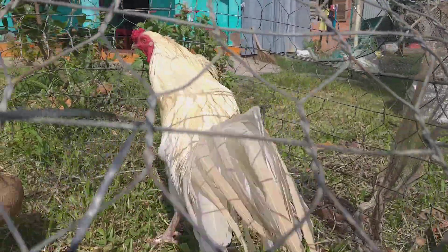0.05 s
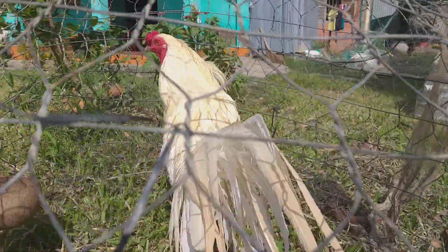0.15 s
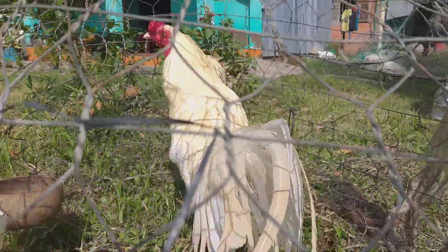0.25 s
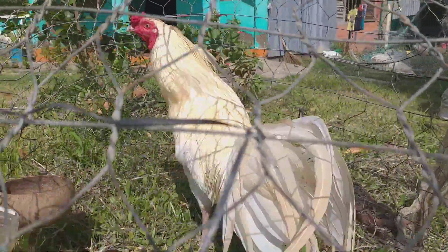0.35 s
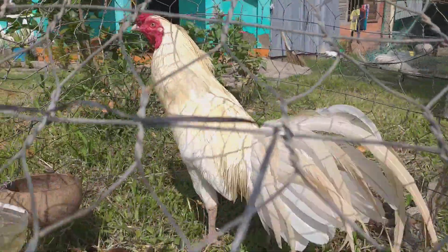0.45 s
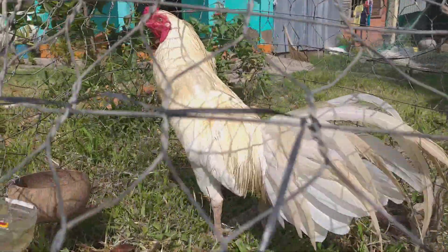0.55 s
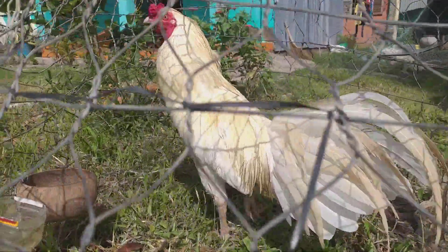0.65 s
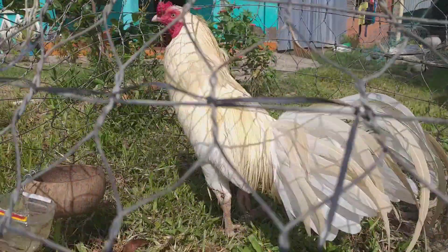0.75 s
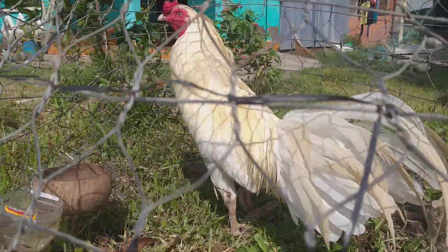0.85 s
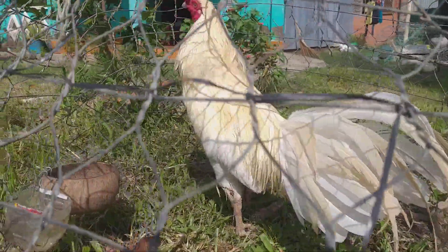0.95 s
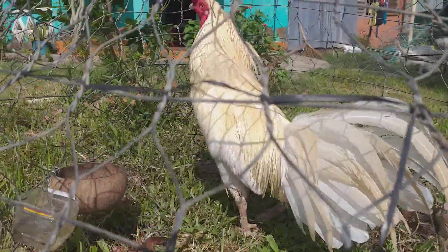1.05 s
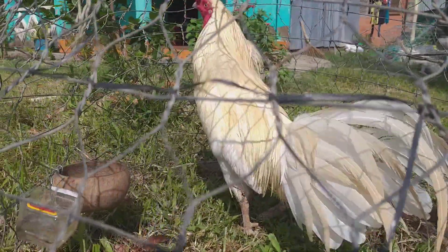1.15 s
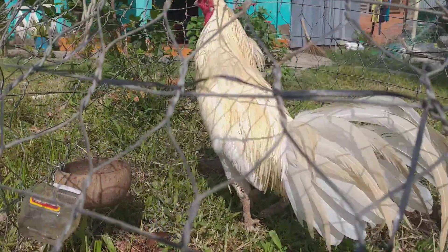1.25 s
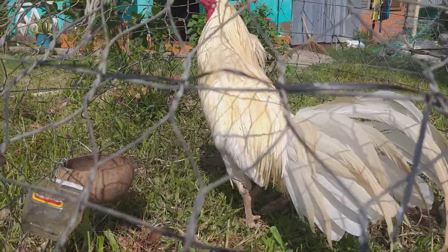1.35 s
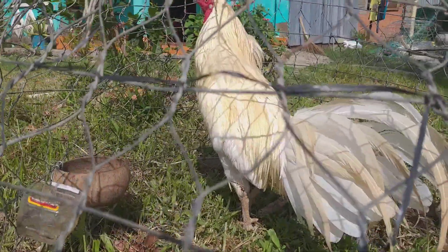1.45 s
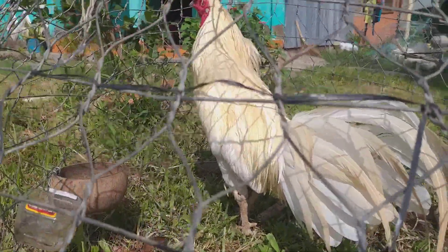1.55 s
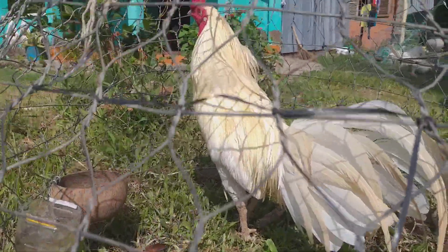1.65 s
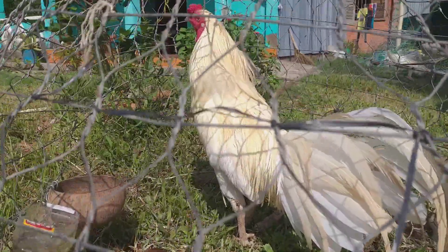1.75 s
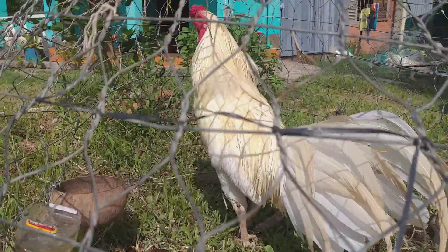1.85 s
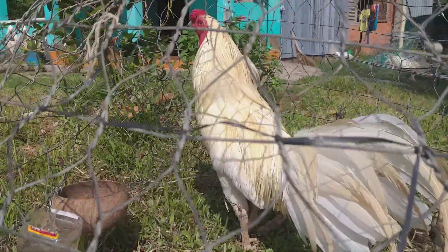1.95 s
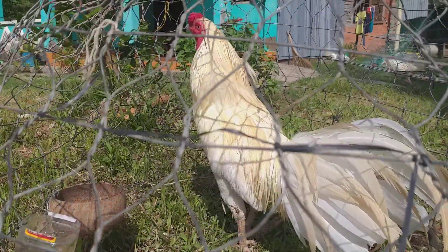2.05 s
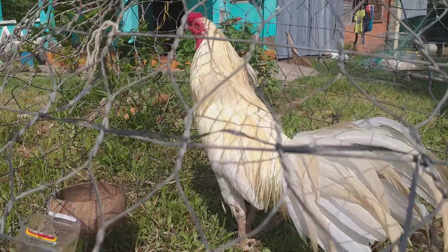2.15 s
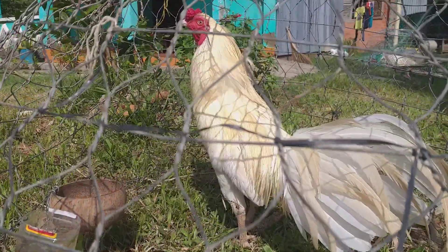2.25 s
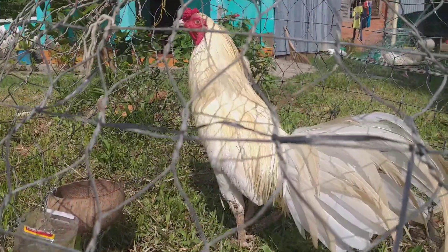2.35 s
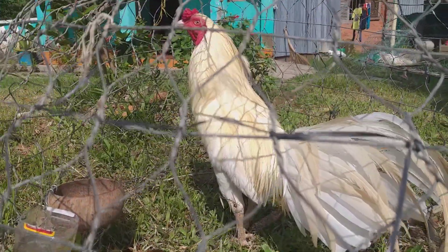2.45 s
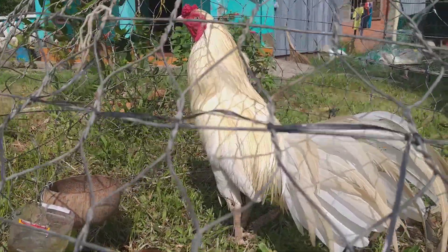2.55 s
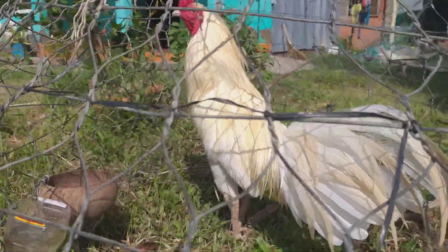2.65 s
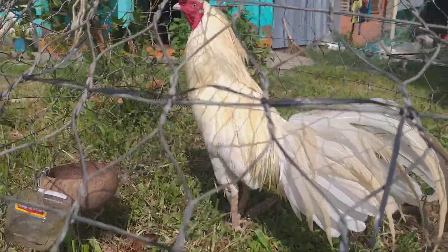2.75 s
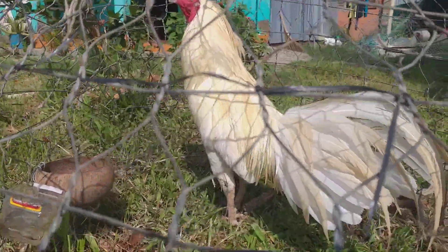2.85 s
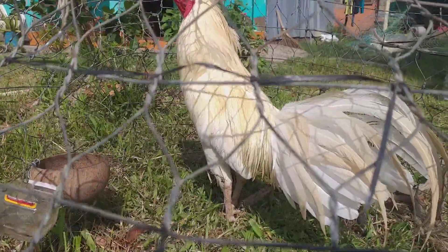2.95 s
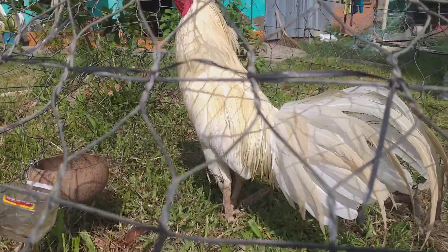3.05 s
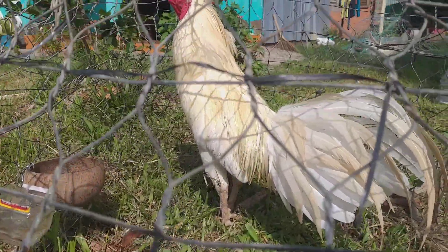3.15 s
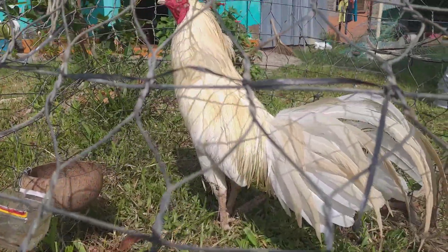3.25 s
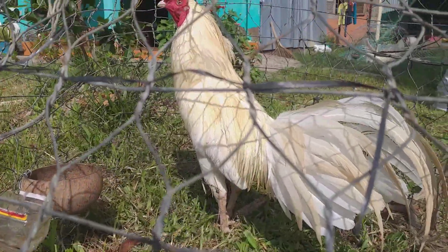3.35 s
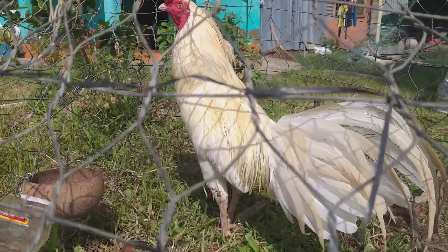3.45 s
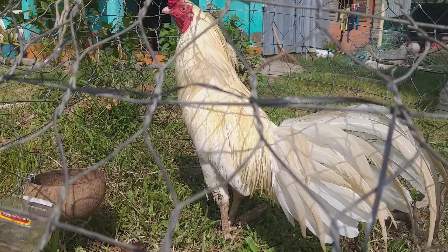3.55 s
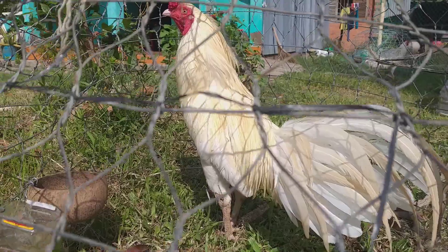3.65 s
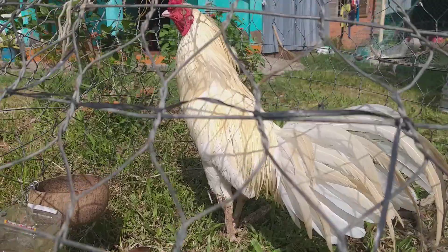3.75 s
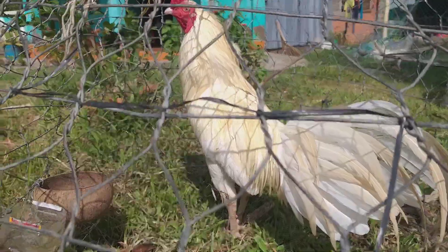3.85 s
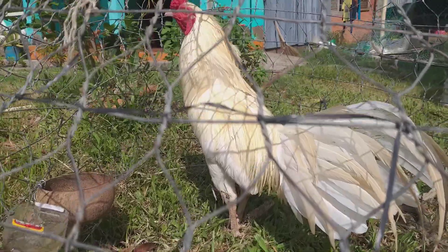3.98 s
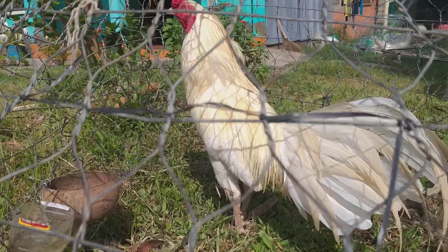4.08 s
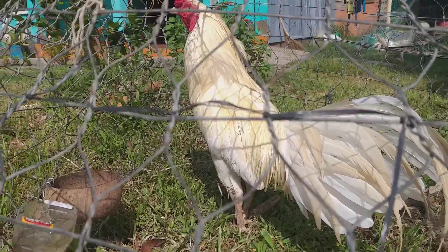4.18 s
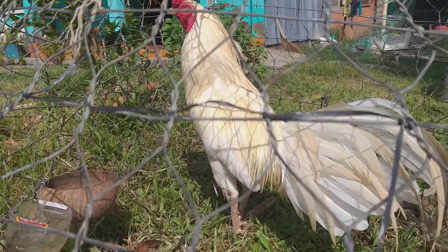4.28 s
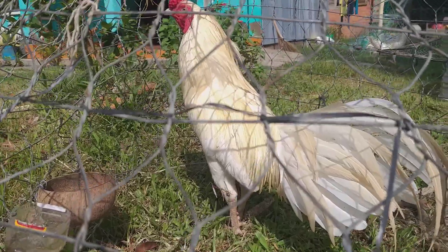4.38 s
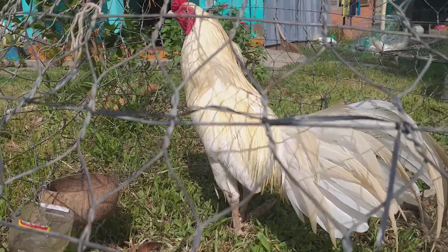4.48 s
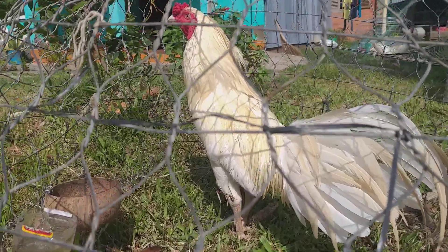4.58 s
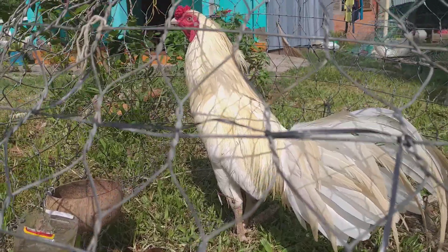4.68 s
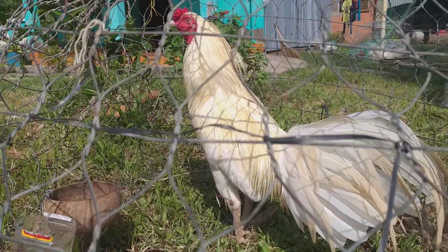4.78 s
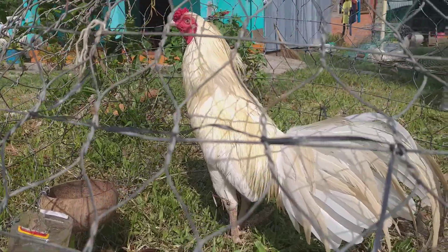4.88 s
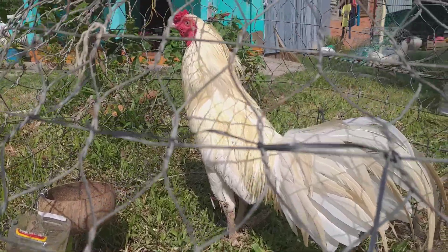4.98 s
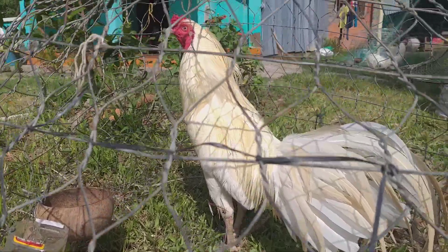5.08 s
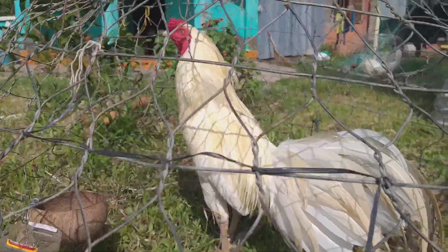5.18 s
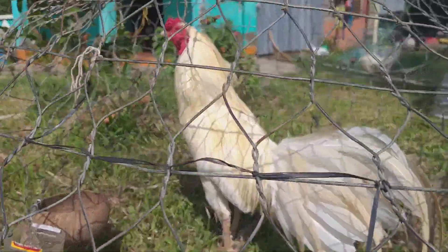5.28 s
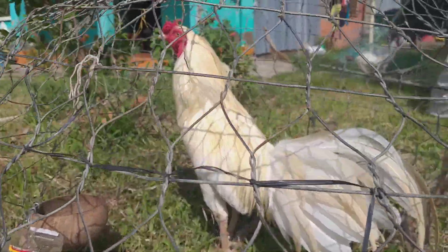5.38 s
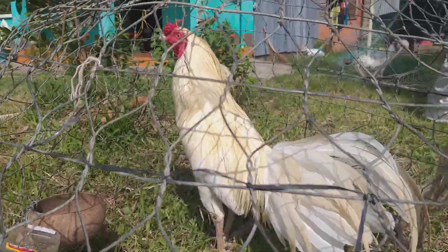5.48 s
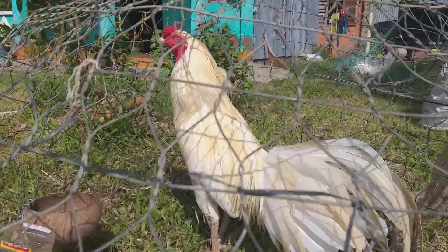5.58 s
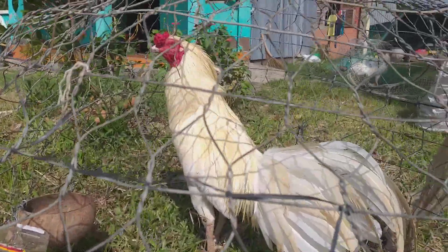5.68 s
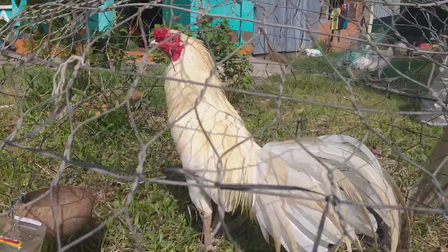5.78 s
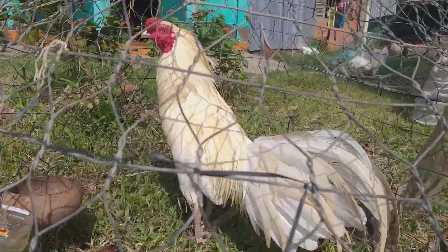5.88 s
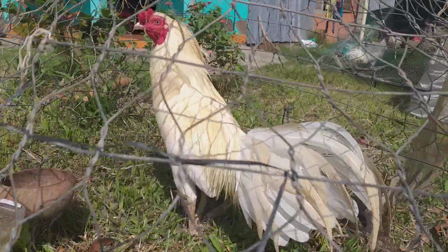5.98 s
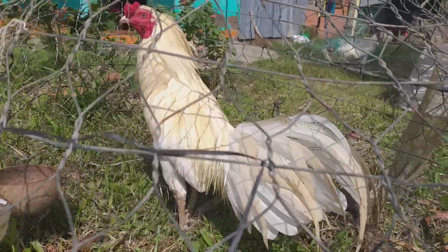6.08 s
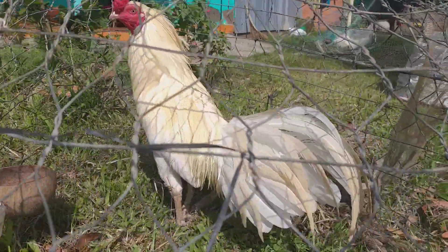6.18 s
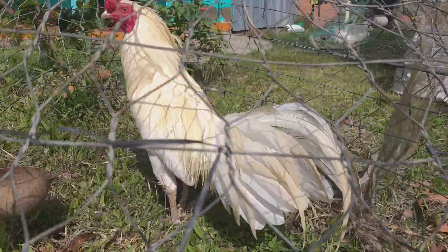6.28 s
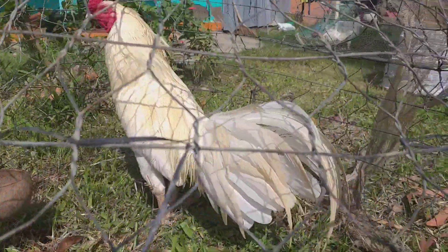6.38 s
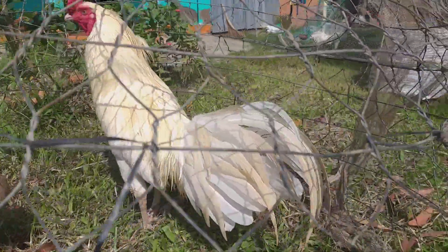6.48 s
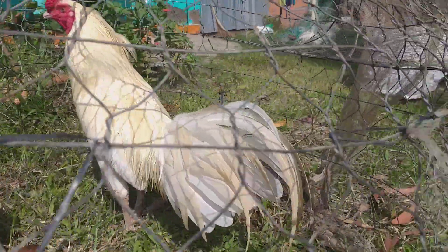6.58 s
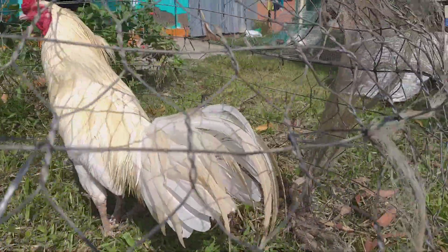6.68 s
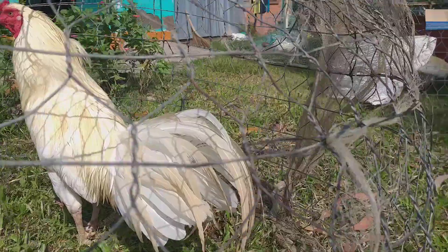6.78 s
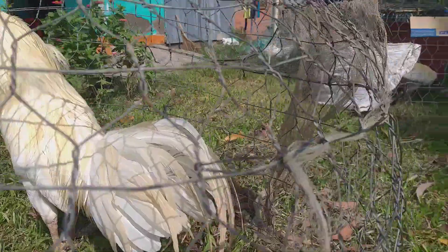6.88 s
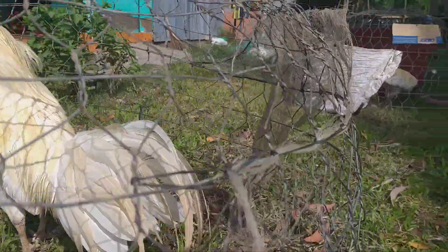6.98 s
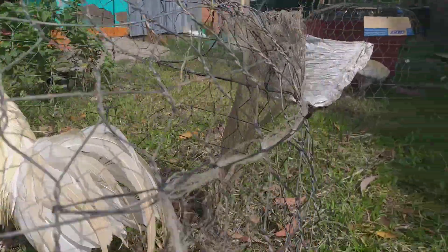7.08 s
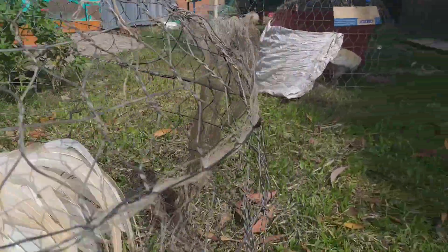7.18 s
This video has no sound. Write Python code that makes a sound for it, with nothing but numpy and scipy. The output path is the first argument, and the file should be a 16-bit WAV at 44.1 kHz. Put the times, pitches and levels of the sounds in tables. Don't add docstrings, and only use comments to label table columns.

```python
import sys
import numpy as np
from scipy import signal
from scipy.fft import rfft, irfft, next_fast_len
from scipy.io import wavfile
from scipy.ndimage import uniform_filter1d, map_coordinates

SR = 44100
rng = np.random.default_rng(int(sys.argv[2]) if len(sys.argv) > 2 else 0)


def log_audio(samples):
    frames = np.atleast_2d(samples).T
    limited = np.clip(frames, -1, 1)
    pcm = np.round(limited * 32767).astype(np.int16)
    wavfile.write(sys.argv[1], SR, pcm)


def ratio(d):
    e = np.asarray(d, float) / 20
    return 10 ** e


N = 318738
TIME = np.arange(N) / SR


def colour(x, points):
    hz, db = np.transpose(points)
    size = next_fast_len(len(x) + 2048)
    gain = ratio(np.interp(np.log(np.fft.rfftfreq(size, 1 / SR) + 1), np.log(hz), db))
    return irfft(rfft(x, size) * gain, size)[:len(x)]


def level(x, db):
    return x * ratio(db) / np.sqrt(np.mean(x ** 2))


def band(x, lo_hz, hi_hz):
    return signal.sosfilt(signal.butter(3, [lo_hz, min(hi_hz, .47 * SR)], "band", fs=SR, output="sos"), x)


def walk(rate):
    k = int(SR / rate)
    steps = np.repeat(rng.standard_normal(N // k + 1), k)
    smooth = uniform_filter1d(uniform_filter1d(steps, k), k)
    return level(smooth[:N], 0)


def fading(length_s, t60):
    t = np.arange(int(length_s * SR)) / SR
    return t, ratio(-60 * t / t60)


def add(out, s, x):
    i = max(int(s * SR), 0)
    out[i:i + len(x)] += x[:len(out) - i]


def bump(s, width_s):
    return np.exp(-.5 * ((TIME - s) / width_s) ** 2)


# (pitch_hz, level_db per Hz)
HUM_COLOUR = [(20, -29), (40, -19.5), (70, -7), (100, 2), (150, -7), (220, -14), (310, -21), (430, -22.5),
              (800, -27.5), (1400, -25.5), (2100, -30.5), (2800, -39), (3600, -32.5), (5500, -33),
              (8000, -26.5), (9600, -43), (16000, -49)]


def village():
    noise = level(colour(rng.standard_normal(N), HUM_COLOUR), -59)
    edges_hz = [10, 400, 2700, 9000, 16500]
    hum = np.zeros(N)
    for lo, hi in zip(edges_hz, edges_hz[1:]):
        hum += ratio(walk(1.9) + 1.1 * walk(9)) * band(noise, lo, hi)
    return hum


# (time_s, effort_db, beak_opening_db)
SYLLABLES = [
    [(.008, -28, 0), (.024, -21, 1), (.036, -17, 4), (.05, -15, 0), (.08, -13.5, 0), (.118, -14, 0),
     (.13, -16.5, 5), (.15, -19, 5), (.168, -30, 0)],
    [(.188, -27, 2), (.204, -19.5, 2), (.226, -18.5, 0), (.238, -15, 2.5), (.32, -14, .5), (.47, -16, .5)],
    [(.5, -14.5, 0), (.62, -15, 0), (.65, -16.5, .5), (.728, -15.5, 1), (.745, -23, 3)],
    [(.78, -33, -3), (.795, -48, 0), (.845, -46, 1), (.86, -27, 1), (.88, -21, 2), (.922, -15, -1)],
    [(.932, -16, 4), (.99, -16, 4.5), (1.03, -16, 2), (1.075, -16.5, -4), (1.115, -16.5, 1.5),
     (1.16, -16.5, 2), (1.214, -16, 4), (1.29, -17, 2)],
    [(1.338, -18, -4), (1.42, -18.5, 0), (1.52, -19, -1), (1.62, -19.5, 0), (1.704, -20, 3),
     (1.734, -47, 2)],
]


def breath():
    s, effort_db, opening_db = np.vstack(SYLLABLES).T
    effort_db, opening_db = np.interp(TIME, s, effort_db), np.interp(TIME, s, opening_db)
    pipe_db = effort_db - 1.1 * opening_db
    beak_db = effort_db - 7.5 + opening_db
    return effort_db, pipe_db, beak_db


# (time_s, length_s, pitch_scatter 0-1, loudness_change_db)
CRACKS = [(0.018, 0.0126, 0.08, 2.5), (0.033, 0.0094, 0, -1), (0.125, .006, 0.07, -4.5),
          (0.144, 0.01235, 0.04, 3), (0.18, 0.028, 0.12, 0), (0.23, 0.0037, 0.1, -8.5),
          (0.485, 0.00967, 0.1, -2.5), (.527, 0.0039, 0.14, -5), (.635, 0.00964, .16, -4.5),
          (.742, .012, 0.15, 0.5), (0.853, 0.014, 0.06, 1), (0.885, 0.035, 0.035, 1),
          (.921, 0.00346, 0.04, -4.5), (1.04, .05, .004, 0), (1.125, .02, .006, -2), (1.27, .025, .004, 0),
          (1.728, 0.01776, 0.14, -1)]


def cracks():
    scatter, loudness_db = np.full(N, .0011), np.zeros(N)
    for s, length, crack_scatter, crack_loudness_db in CRACKS:
        swell = bump(s, .5 * length)
        scatter += swell * crack_scatter
        loudness_db += swell * crack_loudness_db
    return scatter, loudness_db


# (time_s, pitch_hz)
PITCH = [
    [(.008, 585), (.022, 625), (.027, 750), (.037, 760), (.043, 828), (.114, 822), (.124, 783), (.156, 741),
     (.172, 745)],
    [(.186, 560), (.194, 603), (.229, 665), (.238, 743), (.33, 758), (.4, 763), (.62, 758), (.726, 753),
     (.737, 730)],
    [(.743, 498), (.79, 490), (.84, 560), (.853, 628), (.872, 618), (.877, 705), (.917, 752), (.928, 795)],
    [(0.96, 805.3), (1.072, 751.4), (1.124, 773.6), (1.14, 767.4), (1.222, 782.4), (1.31, 752.6)],
    [(1.335, 746), (1.415, 750), (1.49, 735), (1.59, 734), (1.74, 696)],
]


def voice_beat(scatter, collapse):
    hz = np.interp(TIME, *np.vstack(PITCH).T) - 280 * collapse
    beat = hz * np.clip(1 + scatter * walk(1100) + 0.0017 * walk(60), .5, 1.5)
    return hz, beat


TRACT_HZ = [380, 760, 1520, 2280]
CHEST_DB = [-5.5, -8.5, -13.5, -12.5]
# (time_s, level_db)
THROAT = [(.05, -24), (.095, -11), (.3, -31), (.8, -30), (.862, -17), (.875, -12), (.89, -26), (.915, -24),
          (.94, -13), (1.2, -27), (1.47, -12), (1.7, -11)]


def low_partials(effort_db, pipe_db, scatter, collapse, hz, phase, shape, home_hz):
    live = slice(0, len(shape))
    slack = np.maximum(1 - hz[live] / home_hz, 0)
    gulp_db = 25 * np.minimum(2.5 * collapse[live], 1) ** 2
    chest_db = effort_db[live] + 15 * slack + gulp_db + np.interp(shape, range(4), CHEST_DB)
    throat_db = effort_db[live] + 25 * slack + np.interp(TIME[live], *np.transpose(THROAT))
    throat_db += 130 * uniform_filter1d(scatter, size=900)[live]
    tract = np.array([chest_db - 16, chest_db, pipe_db[live], throat_db])
    low = np.zeros(N)
    for k in range(1, 4):
        place = np.interp(k * hz[live], TRACT_HZ, range(4))
        place = place - .8 * np.sin(2 * np.pi * place) / (2 * np.pi)
        db = map_coordinates(tract, [place, np.arange(len(place))], order=1)
        low[live] += ratio(db) * np.cos(k * phase[live])
    return low


SHAPES = [
    [-28, -31, -20.5, -15.5, -35, -33, -42, -36, -58.5, -44, -54.5, -54.5, -48, -46.5, -53.5, -58, -72.5],
    [-6.5, -30, -25, -16, -20, -23.5, -23, -22, -25, -50, -48, -48, -49.5, -44, -44, -50, -51.5],
    [-32, -31, -20, -5.5, -16.5, -27, -8.5, -15.5, -31.5, -44, -46, -40, -38, -36, -30, -41, -44],
    [-27.5, -23, -36, -12.5, -8, -16, -14, -16, -25, -41.5, -37.5, -40.5, -36.5, -30.5, -28.5, -37.5, -42],
]
MUFFLE_DB = [-7, 0, 0, 0]


def upper_partials(beak_db, beat, phase, shape, home_hz):
    live = slice(0, len(shape))
    upper, power = np.zeros(N), np.full(N, 1e-9)
    for k in range(4, 22):
        column = k * beat[live] / home_hz - 4
        db = map_coordinates(np.array(SHAPES, float), [shape, column], order=1, mode="nearest")
        db = db + (1.5 + 0.17 * k) * walk(22)[live] + .22 * k * walk(170)[live]
        gain = ratio(db) * (k * beat[live] < 16000)
        upper[live] += gain * np.cos(k * phase[live] + .3 * (k - 4) ** 2)
        power[live] += gain ** 2
    upper[live] *= ratio(np.interp(shape, range(4), MUFFLE_DB))
    return ratio(beak_db) * upper / np.sqrt(uniform_filter1d(power, size=600))


def rasp(pipe_db, beak_db, scatter, phase):
    air = rng.standard_normal(N)
    hiss = level(band(band(air, 4500, 9200), 4500, 9200), -26.5)
    hiss += level(band(air, 2400, 4500), -40) + level(band(air, 11500, 16500), -36.5)
    hiss *= ratio(beak_db + 60 * scatter) * (1 + np.cos(phase))
    crop = ratio(pipe_db) * 3.5 * scatter * level(band(air, 880, 1120), 0)
    return hiss + crop


SHAPE_S = [.036, .046, .112, .124, .16, .19, .8, .92, 1.25, 1.45]
SHAPE_HZ = [826, 758, 775, 738]


def rooster():
    start_s, end_s = .008, 1.734
    gate = np.clip(np.minimum(TIME - start_s, end_s - TIME) / .004, 0, 1)
    collapse = np.exp(np.minimum(TIME - end_s, 0) / .0115)
    effort_db, pipe_db, beak_db = breath()
    scatter, loudness_db = cracks()
    hz, beat = voice_beat(scatter, collapse)
    phase = 2 * np.pi * np.cumsum(beat) / SR
    live = slice(0, 2 * SR)
    shape = np.interp(TIME, SHAPE_S, [.8, 0, 0, .7, .7, 1, 1, 2, 2, 3])[live]
    home_hz = np.interp(shape, range(4), SHAPE_HZ)
    low = low_partials(effort_db, pipe_db, scatter, collapse, hz, phase, shape, home_hz)
    upper = upper_partials(beak_db, beat, phase, shape, home_hz)
    half_db = -39 + 16 * bump(.66, .025) - 8 * (TIME > 1.33)
    uneven = 1 + ratio(half_db + 3 * walk(30)) * np.cos(phase / 2) + ratio(-37.5) * walk(500)
    voice = np.sqrt(2) * (low + upper) * uneven
    return band(ratio(loudness_db) * gate * (voice + rasp(pipe_db, beak_db, scatter, phase)), 450, 20000)


# (pitch_hz, level_db)
YARD_COLOUR = [(480, 3), (700, -3), (1500, -4), (2300, 0), (3000, -2), (4000, -4.5), (8000, -3.5),
               (16000, -12)]


def yard(x):
    t, near = fading(1.2, t60=0.2)
    far = ratio(-10) * fading(1.2, t60=0.7)[1] * (1 - np.exp(-t / .06))
    tail = colour(rng.standard_normal(len(t)) * (near + far) * (t > .018), YARD_COLOUR)
    echo = signal.fftconvolve(x, tail / np.sqrt(np.sum(tail ** 2)))[:N]
    return map_coordinates(echo, [np.arange(N) + 7.0 * walk(30)], mode="mirror")


# (peak_s, rise_s for 20 dB, fall_s for 20 dB, level_db, crispness_db)
STIRRINGS = [(.165, .03, .1, -50, 0), (.765, .03, .17, -53, 0), (5.565, .16, .1, -39, -8),
             (1.958, .33, .04, -50, 3), (2.0, .03, .6, -64, -4), (2.4, .02, .5, -63, 3),
             (2.52, .25, .08, -61, 1), (3.47, .07, .2, -60, -15), (3.645, .07, .3, -65.5, -11),
             (3.84, .07, .25, -61, -25), (4.15, .05, 1.9, -66.5, -18), (4.64, 1.2, .2, -61.5, -9),
             (5.0, .3, .28, -60.5, -9), (5.48, .28, .35, -43, -6), (5.61, .2, .06, -42, -8),
             (5.8, .3, .2, -47, -4), (5.944, .2, .04, -43.5, -2), (6.21, 1.1, .25, -55, -3.5),
             (6.37, .07, .3, -52, 3), (6.75, .3, .8, -53, -4.5), (6.95, .55, .3, -55, -4)]
# (pitch_hz, level_db per Hz)
GRASS_COLOUR = [(350, -51), (600, -6.5), (790, -0.5), (957, -8.5), (1240, -1), (2010, 3), (3160, -1),
                (4050, -1), (5630, -0.5), (8390, 0.5), (10000, -14), (12700, -6.5), (16000, -15.5)]


def rustle():
    s, rise, fall, db, crisp_db = np.transpose(STIRRINGS)[:, :, None]
    power = ratio(db - 20 * np.maximum((s - TIME) / rise, (TIME - s) / fall)) ** 2
    top = ratio(crisp_db) ** 2
    body = ratio(-4.5 - .7 * np.abs(crisp_db + 8)) ** 2
    sizes = ratio(np.minimum(3.2 * rng.exponential(size=N), 11)) * rng.standard_normal(N)
    snaps = (rng.random(N) < 2500 / SR) * sizes
    grains = colour(level(snaps, -2.5) + rng.standard_normal(N), GRASS_COLOUR) * ratio(1.5 * walk(40))
    out = np.zeros(N)
    for share, lo, hi in [(1, 3000, 7600), (top, 9300, 17500), (body, 800, 3450)]:
        out += np.sqrt((share * power).sum(axis=0)) * level(band(grains, lo, hi), 0)
    return out


# (start_s, length_s, from_hz, to_hz, level_db)
CHIRPS = [(3.17, .04, 3700, 3500, -71.5), (3.31, .05, 4100, 3900, -70.5), (1.73, .07, 690, 590, -36),
          (1.79, .26, 278, 265, -60), (3.76, 0.034, 4000, 3800, -71), (3.815, .025, 7000, 5300, -59),
          (3.832, 0.0122, 3270, 5600, -51.5), (3.836, 0.031, 5546, 4430, -52.5),
          (3.866, 0.0102, 4930, 3670, -47.5), (3.871, 0.01421, 3700, 4740, -48.5),
          (3.884, 0.024, 2862, 4474, -55), (3.903, 0.015, 4540, 4290, -56),
          (3.913, 0.013, 4300, 2796, -55.5), (3.935, 0.009, 2990, 4200, -61.5),
          (4.318, .04, 3600, 3400, -69.5), (2.2, 0.057, 5800, 5600, -69.5)]


def chirps():
    near, far = np.zeros(N), np.zeros(N)
    for s, length, from_hz, to_hz, db in CHIRPS:
        glide_hz = np.geomspace(from_hz, to_hz, int(length * SR))
        whistle = np.sin(2 * np.pi * np.cumsum(glide_hz) / SR)
        add(far if from_hz > 1000 else near, s, ratio(db) * np.hanning(len(whistle)) * whistle)
    return near, far


# (middle_s, width_s, pitch_hz,
# level_db)
MURMURS = [
    (1.86, .08, 560, -54),
    (1.85, .06, 820, -59),
    (4.2, .3, 1350, -75),
    (5.78, .1, 1900, -63),
    (6.35, .15, 1530, -68),
    (6.85, .25, 1550, -69),
    (7.05, .12, 760, -72),
    (5.5, .15, 220, -68),
    (6.55, .15, 280, -70),
]


def murmurs():
    out = np.zeros(N)
    for s, width, hz, db in MURMURS:
        hoarse = level(band(rng.standard_normal(N), .87 * hz, 1.15 * hz), db)
        out += bump(s, width) * ratio(3.0 * walk(12)) * hoarse
    return out


# (time_s, peak_db, pitch_hz, length_s)
WIND_BUMPS = [(1.849, -44, 107.7, 0.03), (2.142, -33.5, 90.56, 0.032), (2.349, -52, 59.2, 0.03),
              (2.449, -44, 99.6, 0.03), (2.609, -41, 118, 0.0477), (2.687, -35, 116, 0.039),
              (3.045, -37.5, 148, 0.0315), (4.199, -46.5, 75.4, 0.03), (5.633, -51, 99.6, 0.027),
              (6.519, -45.5, 103, 0.03218)]


def wind():
    out = np.zeros(N)
    for s, db, hz, length in WIND_BUMPS:
        size = int(3 * length * SR)
        x = band(rng.standard_normal(size), 0.434 * hz, 1.61 * hz) * np.hanning(size) ** 2
        add(out, s - length, ratio(db) * x / np.abs(x).max())
    return out


# (time_s, peak_db, centre_hz, spread_octaves each way)
TICKS = [(1.91, -31.5, 5400, 0.57), (1.96, -35, 7595, 1.047), (2.316, -47.5, 8440, 0.62),
         (2.3945, -42.5, 9000, 0.65), (2.422, -39.5, 9000, 0.696), (2.4539, -36, 8050, 0.797),
         (3.476, -35, 6459, 0.703), (3.499, -39.5, 7510, .8), (4.1425, -53.5, 7000, 0.57),
         (4.383, -41, 6500, 0.41), (4.638, -45.5, 4900, .9), (5.0105, -45, 7900, 0.305),
         (5.42, -35, 5004, 0.646), (5.502, -41, 6500, .4), (5.509, -22, 8000, 1.92),
         (5.6253, -15, 4500, 2.17), (5.644, -37, 6000, 0.82), (5.681, -33.5, 8980, 1.106),
         (5.94, -30, 6090, .9), (6.0764, -27.5, 11500, 0.518), (6.924, -37.5, 8470, .8),
         (7.2006, -36.5, 7630, 1.05)]


def twigs():
    out = np.zeros(N)
    for s, db, hz, octaves in TICKS:
        t, fall = fading(.03, t60=0.0077)
        x = band(rng.standard_normal(len(t)) * fall, hz / 2 ** octaves, hz * 2 ** octaves)
        add(out, s, ratio(db) * x / np.abs(x).max())
    return out


# (time_s, peak_db, dull_thud_db)
KNOCKS = [(2.6598, -19.5, 0), (2.668, -20, -18), (2.68, -28, -18.5), (2.6895, -23, -22),
          (2.697, -22, -11.5), (2.708, -28, -16), (2.714, -27, -16), (2.74, -33, -6), (3.425, -40, -3),
          (4.7245, -23, -1.5), (4.732, -22, -15.5), (4.743, -22.5, -19), (4.7545, -23.5, -14),
          (4.762, -26, -14), (4.771, -28, -14), (4.831, -33, -18), (6.4806, -15.5, -5), (6.488, -10.5, -12),
          (6.505, -20, -12), (6.512, -26, -14), (6.518, -22.5, -13.5), (6.532, -27, -10.5),
          (6.561, -31, -8)]
# (pitch_hz, t60_s, first_place_db, second_place_db, third_place_db)
TIN_TONES = [(1940, .35, -15, -15, -17), (2213, .5, -20, -16, -11), (3450, .4, -12, -11, -9),
             (4560, .15, -8, -14, -10), (4950, .15, -12, -12, -8), (5453, .52, -15, -5, -10),
             (5840, .55, -13, -10, -6), (8990, .45, -13, -26, -28), (10150, .35, -24, -14, -15),
             (10790, .3, -26, -16, -17), (11130, .35, -22, -22, -19), (12800, .36, -6, -11, -8),
             (13620, .15, -18, -14, -24)]
PLACE_S = [3, 6]
# (pitch_hz, level_db per Hz)
CLANG_COLOUR = [(240, -32.5), (600, -28.5), (1400, -9.5), (2180, -7.5), (2700, -10), (3400, -1.5),
                (4100, -1.5), (5600, -1.5), (6600, -7), (9040, -10.5), (9700, -22), (13100, -14),
                (16000, -32)]


def tin():
    out = np.zeros(N)
    for s, db, thud_db in KNOCKS:
        t, crack = fading(.7, t60=0.015)
        shimmer = ratio(-15.5) * fading(.7, t60=0.66)[1] * (1 - np.exp(-t / 0.0027))
        x = level(colour(rng.standard_normal(len(t)), CLANG_COLOUR), -8.5) * (crack + shimmer)
        purer_db = -.45 * min(db + 22, 0)
        for hz, t60, *place_db in TIN_TONES:
            ring = np.sin(2 * np.pi * hz * (t + s))
            ring *= 1 + .6 * np.sin(2 * np.pi * .004 * hz * (t + s))
            ring *= 1 + .5 * np.sin(2 * np.pi * .0067 * hz * t)
            struck_db = place_db[np.searchsorted(PLACE_S, s)] - 24.5 + purer_db
            x += ratio(struck_db + 1.5 * rng.standard_normal()) * fading(.7, .75 * t60)[1] * ring
        x = band(x, 212, 6800) + ratio(-.8 * (thud_db + 13)) * band(x, 6800, 21980)
        thud = level(band(rng.standard_normal(len(t)), 1696, 2204), 0)
        x += ratio(thud_db - 7) * fading(.7, t60=0.0348)[1] * thud
        add(out, s, ratio(db) * x * (1 - np.exp(-t / 0.00044)))
    return out


def far_whistle():
    start_s, surge_s, again_s, end_s = 5.72, 5.94, 6.09, 6.28
    gate = np.clip(np.minimum(TIME - start_s, end_s - TIME) / .12 + .5, 0, 1)
    surge = bump(surge_s, .04)
    hz = (2030 + 40 * surge) * (1 + 0.009 * walk(90))
    db = -65 + 7 * (surge + bump(again_s, .02)) + 4.5 * walk(35)
    return gate * ratio(db) * np.sin(2 * np.pi * np.cumsum(hz) / SR)


def scene():
    hum, bird, grass, knock = village(), rooster(), rustle(), tin()
    sigh, birds = chirps()
    near = sigh + murmurs() + wind() + twigs() + far_whistle()
    echoed = ratio(-16) * bird + ratio(-16.5) * knock + ratio(-1.0) * birds
    mid = bird + knock + birds + near + grass + hum + yard(echoed)
    side = ratio(-18) * band(mid, 1100, 2600) + ratio(-27) * band(mid, 2600, 7500)
    side += ratio(-22) * np.roll(band(mid, 7500, 16000), 3)
    side += ratio(-26) * yard(echoed)
    return np.array([mid + side, mid - side])


def band_limit(x):
    return signal.sosfilt(signal.butter(12, 16980, fs=SR, output="sos"), x)


def record(dry):
    top_cut = signal.ellip(8, .2, 60, 15650, fs=SR, output="sos")
    mix = signal.sosfilt(top_cut, dry)
    return band_limit(mix)


dry = scene()
out = record(dry)
log_audio(out)
```